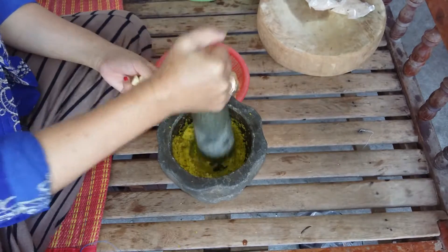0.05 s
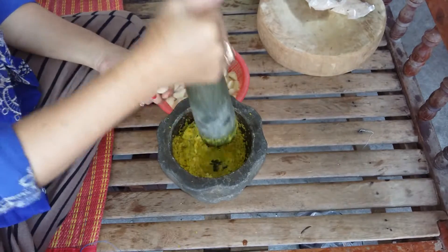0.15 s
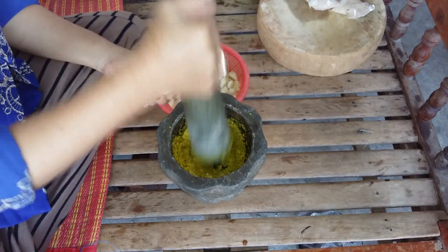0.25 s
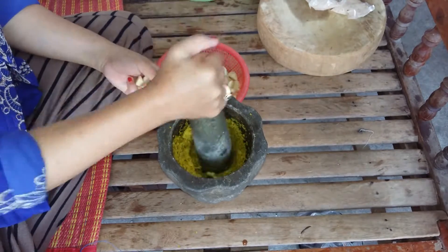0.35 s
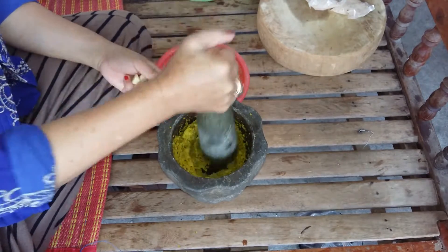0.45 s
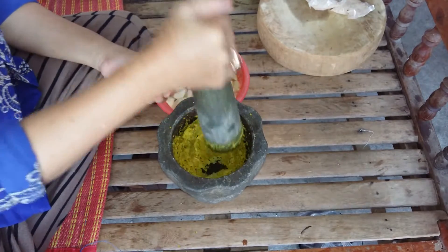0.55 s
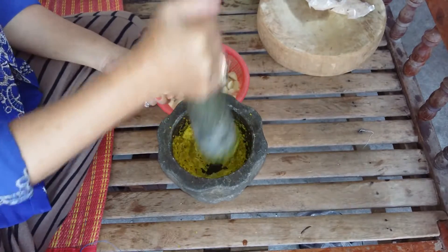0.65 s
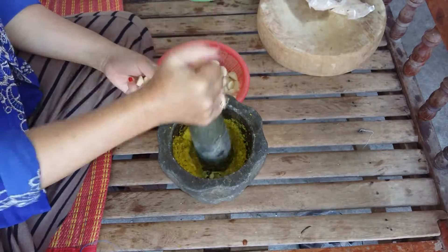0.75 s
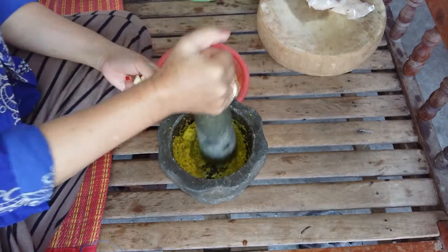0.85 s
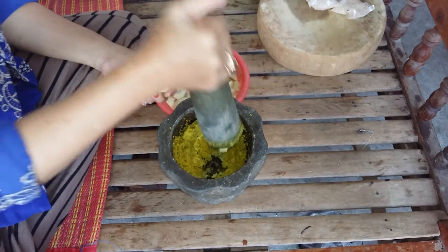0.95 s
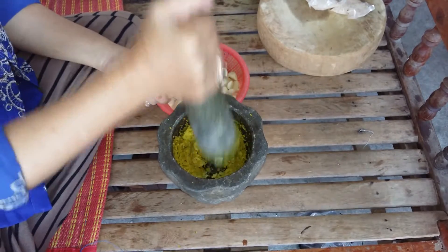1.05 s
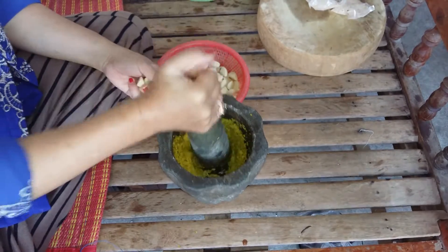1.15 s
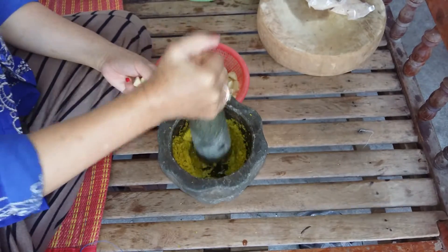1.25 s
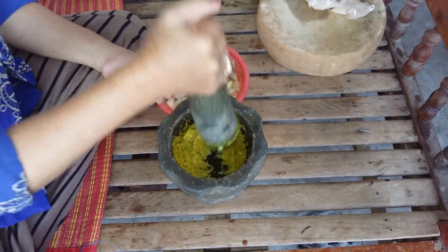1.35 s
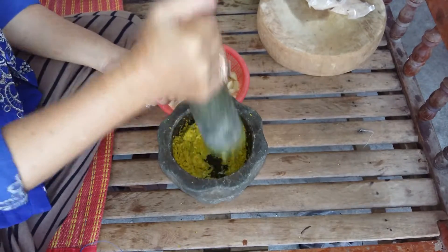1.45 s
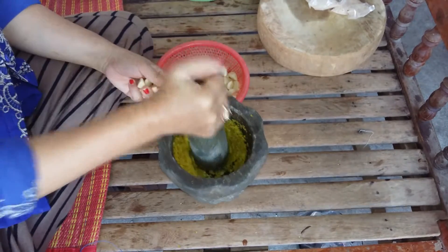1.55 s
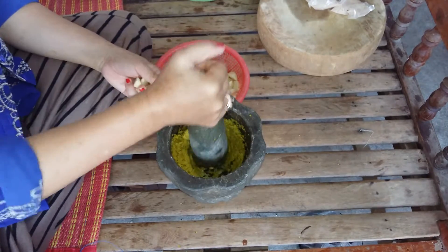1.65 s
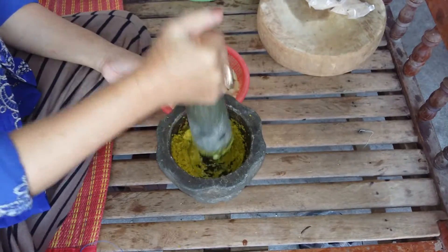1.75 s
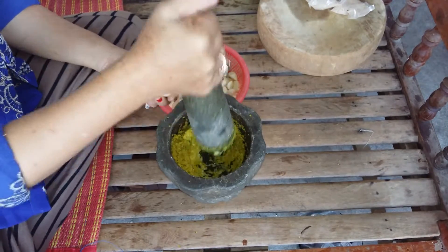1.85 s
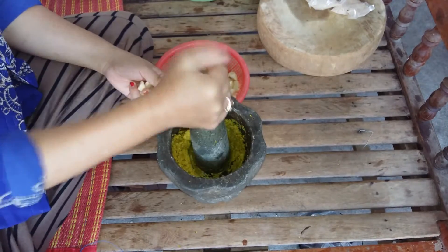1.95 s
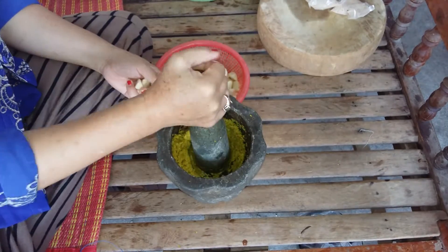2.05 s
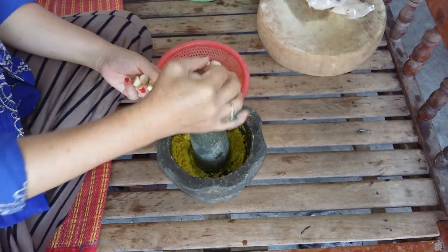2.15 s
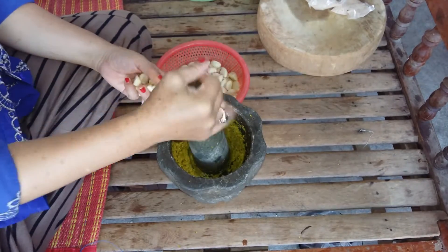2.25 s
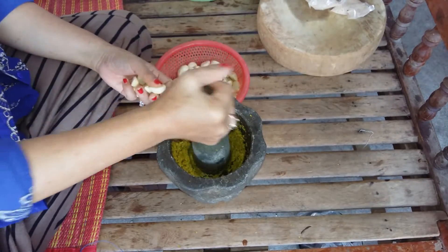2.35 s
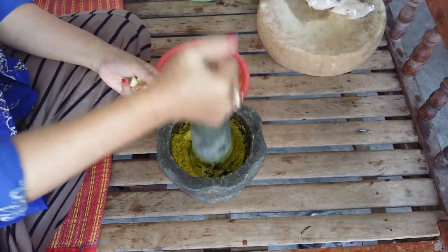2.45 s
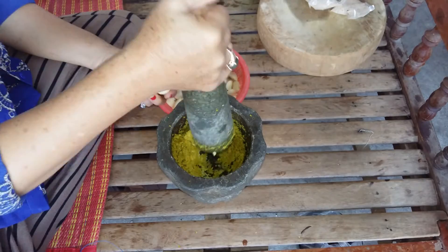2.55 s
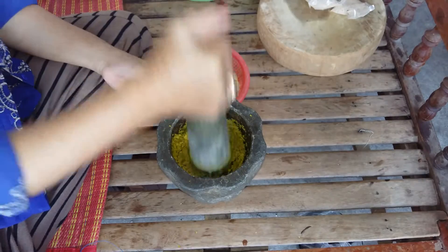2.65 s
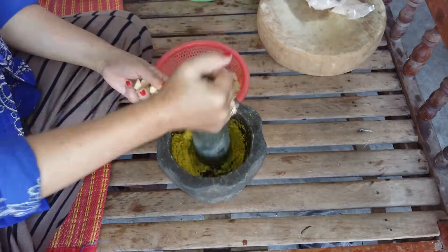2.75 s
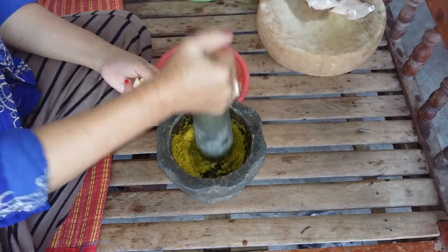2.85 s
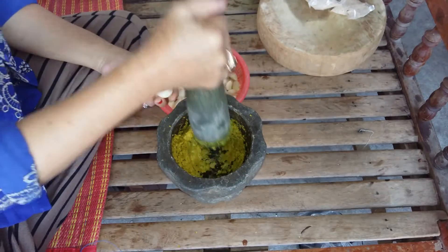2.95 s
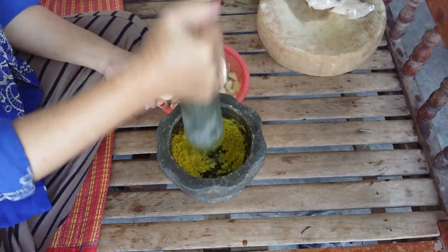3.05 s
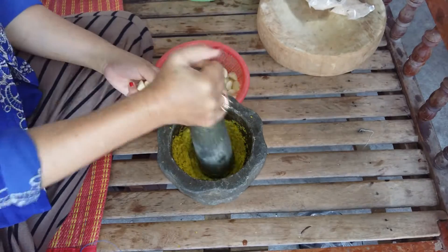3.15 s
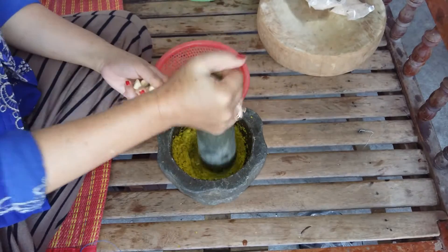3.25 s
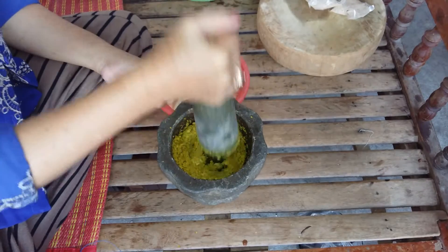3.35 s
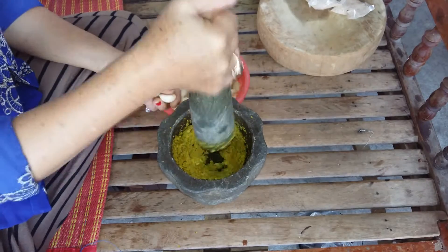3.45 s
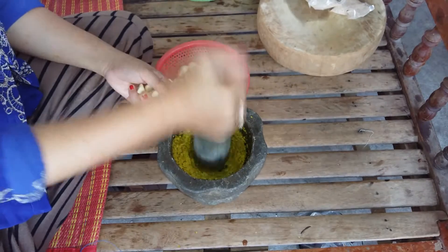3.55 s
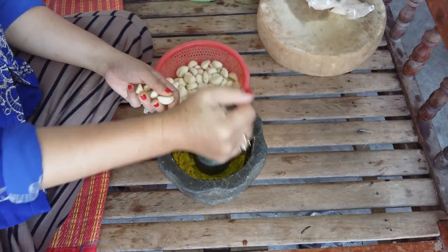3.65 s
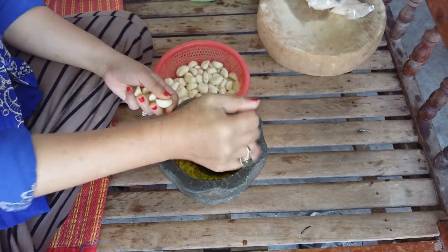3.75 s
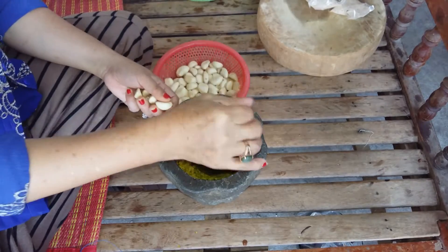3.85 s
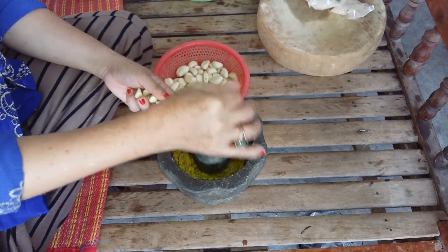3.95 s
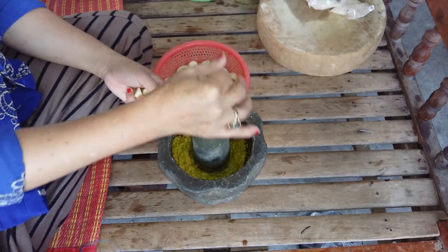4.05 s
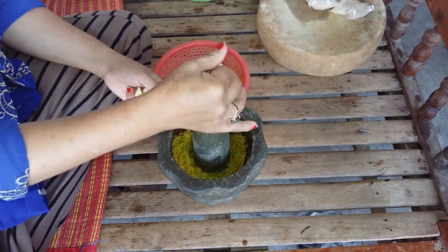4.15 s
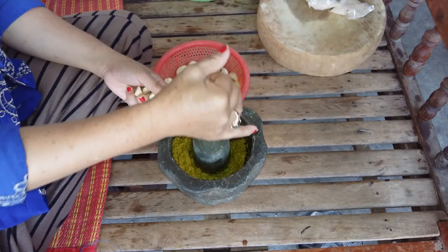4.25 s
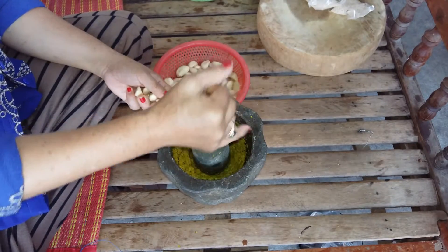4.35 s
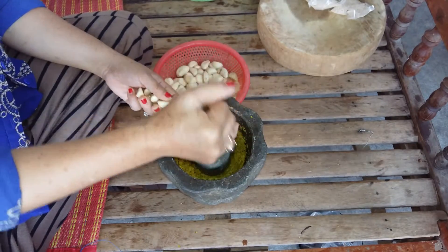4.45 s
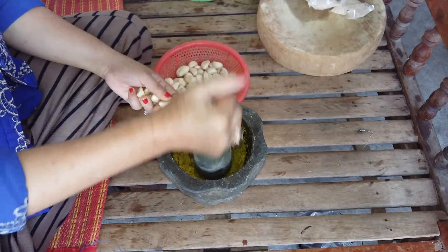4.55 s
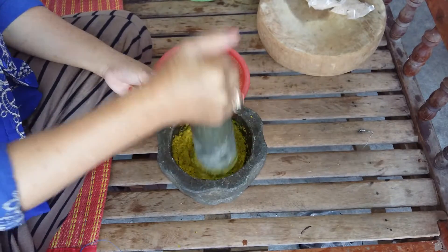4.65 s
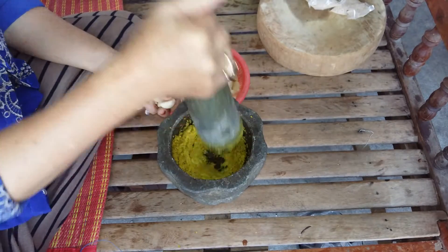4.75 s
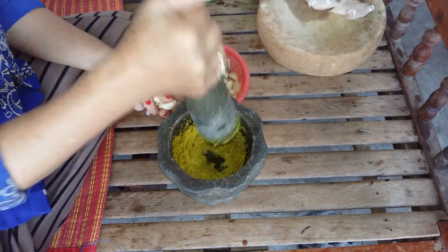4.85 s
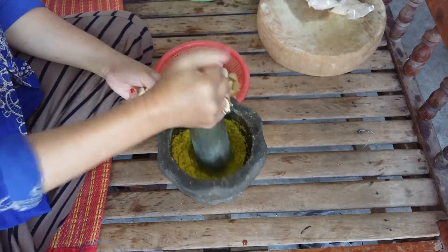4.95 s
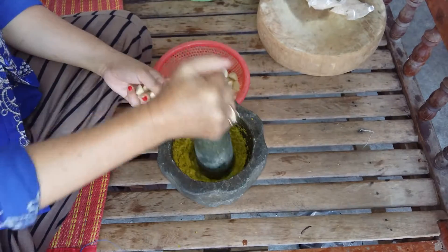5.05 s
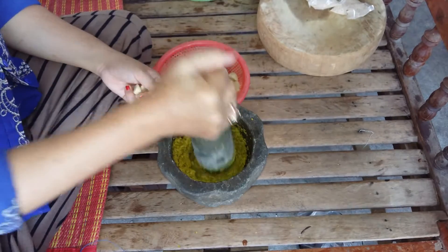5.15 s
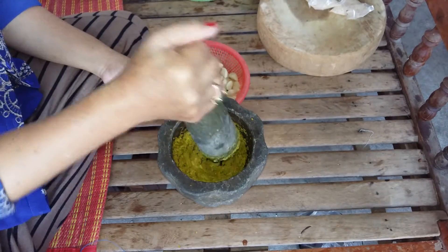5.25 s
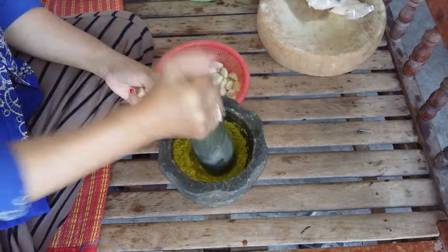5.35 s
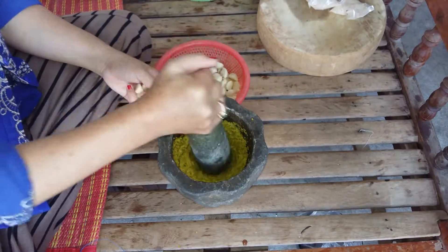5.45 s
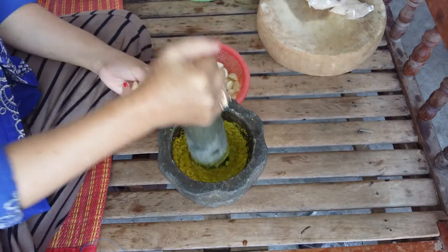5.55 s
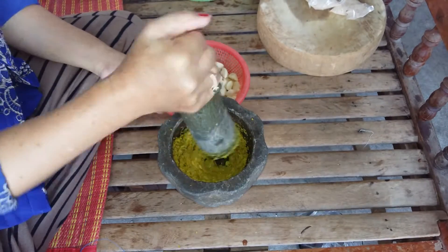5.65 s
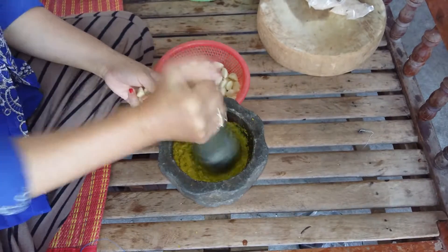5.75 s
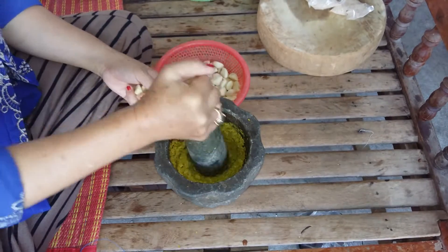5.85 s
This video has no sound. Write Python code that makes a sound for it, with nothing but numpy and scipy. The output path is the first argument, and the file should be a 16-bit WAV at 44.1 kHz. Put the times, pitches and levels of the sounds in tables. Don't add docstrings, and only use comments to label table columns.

```python
import sys
import numpy as np
from scipy import signal
from scipy.fft import rfft, irfft, next_fast_len
from scipy.io import wavfile
from scipy.ndimage import map_coordinates

SR = 44100
rng = np.random.default_rng(int(sys.argv[2]) if len(sys.argv) > 2 else 0)


def materialize(psi):
    bounded = np.clip(np.atleast_2d(psi).T, -1, 1)
    quanta = np.round(bounded * 32767).astype(np.int16)
    wavfile.write(sys.argv[1], SR, quanta)


def volts(x):
    e = np.asarray(x, float) / 20
    return 10 ** e


N = 260631
SPAN = 32768
CONTACT_N = 6000
SPIT_S = 0.001

# f/Hz, level/dB
MIC = [(20, -27.5), (60, -15.5), (200, -6), (3500, -1), (4500, -2), (6000, 3.5), (6800, -7), (7500, -14),
       (9000, -23), (12000, -38), (16000, -45.5)]


def pounding():
    out = np.zeros((2, N + 3 * SPAN))
    hard_blows(out)
    pestle_ring(out)
    paste_landings(out)
    mortar_hops(out)
    return filtered(out, lambda hz: causal(MIC, hz))[:, SPAN:SPAN + N]


# t/s, peak/dB, knock f/Hz, slat thump/dB re peak, crack/dB re peak
BLOWS = [
    (-0.029, 8, 889.5, -20, -15),
    (1.186, -1, 1818, -19, -19.5),
    (1.5904, -1, 1975, -21.5, -21.5),
    (2.021, 2, 887, -26.5, -20),
    (3.6705, 4.5, 882, -17.5, -17.5),
    (5.465, 6.5, 891, -18.5, -16.5),
]
# t/s, peak/dB, knock f/Hz
REBOUNDS = [
    (1.196, -4, 871),
    (3.685, -4, 895),
    (5.471, -11.5, 1017),
]


def hard_blows(out):
    for s, *how in BLOWS:
        add(out, s, shelter(*blow(*how, rattle_db=-10), wet_db=6))
    for s, db, knock_hz in REBOUNDS:
        near, sent = blow(db, knock_hz, thump_db=-17.5, crack_db=-14.5, rattle_db=-12.5)
        add(out, s, shelter(near, sent, wet_db=6))


def blow(db, knock_hz, thump_db, crack_db, rattle_db):
    t = np.arange(CONTACT_N) / SR
    push = impulse(0.001)
    cycles = knock_hz * t

    swell = (cycles / 1.3) ** 2 * np.exp(2 - 2 * cycles / 1.3)
    linger = 0.17 * (1 - np.exp(-(cycles / 2) ** 2)) * volts(-60 * cycles / 25)
    upper = 0.67 * (880 / knock_hz) ** 2 * np.sin(2 * np.pi * 1.728 * cycles)
    knock = (np.sin(2 * np.pi * cycles) + upper) * (swell + linger)

    bright = lambda hz: 1j * hz / (1j * hz + 2500)
    crack_env = volts(crack_db + 7.5 - 60 * t / 0.012) * (1 - np.exp(-(t / 0.00013) ** 2))
    crack = crack_env * filtered(rng.standard_normal(len(t)), bright)
    chip = volts(crack_db + 8) * burst(t, SPIT_S, lambda f: band(12000, 8000)(f) ** 2)

    wood = table(t, volts(thump_db - 10) * push, rattle_db - 28)
    wood = wood + filtered(volts(-11) * push, body(BOWL))
    rise_s = 0.0025
    thud = volts(thump_db + 3) * np.sin(2 * np.pi * 310 * t) * t / rise_s * np.exp(1 - t / rise_s)

    snap = filtered(volts(crack_db + 27) * push, bright)
    pulse = np.sin(2 * np.pi * cycles) * cycles * np.exp(1 - cycles / 0.7)
    near = thud - volts(-4.5) * knock + crack + chip + wood
    return volts(db) * near, volts(db) * (volts(-6.5) * pulse + snap + wood)


# t/s, level/dB
RING = [
    (1.5909, -2),
]
PESTLE_HZ = [2915, 2995, 3060, 3120, 2930, 3009, 3068]
# level/dB, t60/s
PESTLE = [(-5, 0.042), (-7, 0.091), (-11, .1), (-18, 0.0804), (-36.5, .5), (-33, .7), (-33.5, 0.63)]


def pestle_ring(out):
    t = np.arange(SPAN) / SR
    ring = np.zeros(SPAN)
    for k, (hz, (level, t60)) in enumerate(zip(PESTLE_HZ, PESTLE)):
        ring += (-1) ** k * volts(level - 60 * t / t60) * np.sin(2 * np.pi * hz * t)
    for s, db in RING:
        add(out, s, shelter(volts(db) * ring, volts(db) * ring, wet_db=-0.5))


# t/s, tick/dB, slat thump/dB
TICKS = [(0.3721, -16.5, -34), (0.4057, -27.5, -31), (0.431, -27, -45.5), (0.7838, -19, -27),
         (0.84, -20, -50.5), (1.687, -25.5, -34.5), (2.3152, -45.5, -58.5), (2.797, -35.5, -42),
         (3.2039, -34, -64), (3.2121, -31, -52), (5.0431, -23, -46.5), (5.052, -27.5, -50),
         (5.8532, -30, -54), (5.8622, -26.5, -38)]
# t/s, crunch/dB, slat thump/dB
CRUNCHES = [(0.3871, -24.5, -33), (0.4295, -26.5, -50.5), (0.4802, -41, -46), (0.7957, -24, -27),
            (0.842, -24, -38.5), (0.8979, -41.5, -41), (2.8125, -37, -40.5), (2.8421, -42, -65),
            (2.8803, -40.5, -44), (3.4636, -59.5, -48.5), (5.065, -32.5, -27), (5.0841, -21.5, -35),
            (5.115, -38, -34.5), (5.8733, -34, -35), (5.9064, -46.5, -26)]


def paste_landings(out):
    for s, db, thump_db in TICKS:
        near, sent = squash(db, db - 19.5, thump_db, life_s=0.004, rattle_db=-48)
        add(out, s, shelter(near, sent, wet_db=1))
    for s, db, thump_db in CRUNCHES:
        near, sent = squash(db - 9, db, thump_db, life_s=0.0043, rattle_db=db - 13.5)
        add(out, s, shelter(near, sent, wet_db=1))


def squash(tick_db, crunch_db, thump_db, life_s, rattle_db):
    t = np.arange(CONTACT_N) / SR
    wet = volts(tick_db + 4.5) + volts(crunch_db + 2)
    tick = wet * burst(t, life_s, lambda f: band(6000, 2200)(f) + band(11000, 9000)(f) ** 2)
    spit = wet * volts(1) * burst(t, SPIT_S, lambda f: band(12000, 8000)(f) ** 2)
    grit = lambda f: band(1350, 2000)(f) * (1 + 0.1 * body(BOWL)(f))
    crunch = volts(crunch_db + 8) * burst(t, 2.2 * life_s, grit)
    wood = table(t, volts(thump_db + 0.5) * impulse(0.004), rattle_db - 17)
    sent = volts(0.5) * (volts(-1) * tick + crunch) + volts(4) * wood
    return tick + spit + volts(0.5) * crunch + wood, sent


# first hop t/s, level/dB, slat f/Hz, hop interval/s
ROCKS = [(0.566, -38.5, 305, 0.066), (0.973, -37.5, 310, 0.061), (1.319, -29.5, 294, .062),
         (1.449, -42.5, 327, .061), (1.74, -33.5, 310, 0.07), (2.199, -46, 298, 0.067),
         (2.993, -46.5, 307.4, 0.06), (3.269, -43, 320, 0.054), (5.299, -43.5, 367, 0.09)]
# t/s, level/dB
TAPS = [
    (1.104, -51),
    (3.369, -53),
    (3.430, -52),
]


def mortar_hops(out):
    for s, db, hz, interval_s in ROCKS:
        for k in range(3):
            add(out, s + k * interval_s, shelter(*rock(db - 7 * k, hz, tap_db=-3), wet_db=-7.5))
    for s, db in TAPS:
        add(out, s, shelter(*rock(db, 330, tap_db=5), wet_db=-7.5))


def rock(db, hz, tap_db):
    t = np.arange(CONTACT_N) / SR
    hollow = np.sin(2 * np.pi * hz * t) * (t / 0.012) * np.exp(1 - t / 0.012)
    tap = volts(tap_db + 4.5) * burst(t, 0.029, lambda f: band(800, 900)(f) ** 2)
    return volts(db - 1) * (hollow + tap), volts(db + 2) * (hollow + tap)


# f/Hz, width/Hz, level/dB
SLATS = [(104, 110, 1), (165, 37, -3), (221, 38, -2.5), (320, 49, -1), (377, 37, -3), (562.3, 78, 0),
         (722, 72, -4.5)]
# f/Hz, width/Hz, level/dB
BOWL = [(889, 300, -8.5), (1467, 220, -6), (2060, 590, -2), (3200, 545, -1.5)]


def table(t, push, rattle_db):
    noise = rng.standard_normal((2, len(t)))
    chatter = volts(rattle_db - 60 * t / 0.26 + 5.4 * noise[0]) * noise[1] * (1 - np.exp(-t / 0.0051))
    slats = filtered(push + volts(-20.5) * chatter, body(SLATS))
    return slats + filtered(volts(-12.5) * chatter, body(BOWL)) + filtered(chatter, band(3700, 6000))


# t/s, effort/dB
EFFORT = [(0, -49), (.2, -48.5), (.6, -52), (1.2, -52), (1.36, -41.5), (1.56, -49), (2.15, -56.5),
          (2.6, -68.5), (2.98, -58.5), (3.3, -57), (3.52, -49), (3.83, -56.5), (4.36, -67), (4.9, -69.5),
          (5.1, -49.5), (5.25, -42.5), (5.43, -44.5), (5.58, -111)]
# t/s, level/dB
PULLS = [(.07, -32), (.18, -68), (1.36, -45.5), (1.78, -63.5), (2.19, -53), (3.24, -66), (3.64, -74),
         (3.85, -61), (4.0, -64), (5.24, -50), (5.36, -64)]
# f/Hz, level/dB
RUB = [(120, -35), (220, -2.5), (350, 0.5), (700, -7), (1500, -17), (3000, -50)]
# f/Hz, level/dB
RUMBLE = [(30, -46), (60, -2.5), (110, 2.5), (180, -2), (300, -46.5)]
# f/Hz, level/dB
SQUELCH = [(800, -29.5), (1500, 2), (3000, -2.5), (4500, -8), (6000, -2), (7500, -18), (9000, -50),
           (11000, -91.5)]


def grinding():
    t = np.arange(N) / SR
    effort_db = np.interp(t, *np.transpose(EFFORT))
    rub = volts(effort_db - 3.5) * volts(2.5 * wobble(18)) * rush([*RUB, (7000, -110)])
    rumble = volts(effort_db - 4.5) * rush([*RUMBLE, (800, -110)])

    usual_db, rise_s, fall_s = -50.5, 0.04, 0.065
    wet = volts(usual_db - 17.5 + 0.85 * (effort_db - usual_db))
    for s, db in PULLS:
        wet = wet + volts(db) * np.exp(np.minimum((t - s) / rise_s, (s - t) / fall_s))
    return rub + rumble + wet * volts(1.3 * wobble(27)) * rush(SQUELCH)


# t/s, length/s, f/Hz, level/dB
SLIDES = [
    (5.375, .09, 5950, -63),
    (5.16, .2, 6000, -65),
    (3.18, .07, 5900, -64),
]


def slides():
    return sum(swelling_band(*row) for row in SLIDES)


# t/s, length/s, f/Hz, level/dB
BIRDS = [(1.97, .06, 4650, -74), (2.628, 0.086, 4170, -76), (3.433, 0.14, 4400, -68),
         (4.051, 0.13, 4670, -72), (4.894, 0.22, 4560, -76), (4.91, 0.12, 3900, -76),
         (4.55, 0.2, 1712, -81.5), (4.85, 0.2, 1712, -81)]


def birds():
    return sum(swelling_band(*row) for row in BIRDS)


def swelling_band(s, length_s, hz, db):
    width_hz = hz ** 2 * 1.2e-5
    x = filtered(rng.standard_normal((2, N)), lambda f: 1 / (1 + ((f - hz) / width_hz) ** 2))
    phase = np.clip((np.arange(N) / SR - s) / length_s, 0, 1)
    return volts(db) * unit(x) * np.sqrt(np.sin(np.pi * phase).clip(0))


# f/Hz, level/dB per Hz
FAR = [(24, -50), (40, -23.5), (59, -2.5), (186, -4), (351, -19.5), (384, -11), (478, -24), (664, -14.5),
       (1460, -45.5), (1670, -31.5), (2530, -50), (5960, -34), (7590, -54.5), (9870, -83), (16700, -120)]


def traffic():
    return volts(-63.5 + 1.2 * wobble(3)) * rush(FAR) + volts(-91.5) * rng.standard_normal((2, N))


# f/Hz, t60/s
SHELTER = [(100, 0.31), (300, 0.37), (800, 0.38), (3000, 0.39), (6500, 0.37), (8500, 0.32), (15000, 0.32)]


def shelter(near, sent, wet_db):
    hz, t, z = signal.stft(rng.standard_normal((2, SPAN)), SR, nperseg=256)
    decay = volts(-60 * t / along(SHELTER, hz)[:, None])
    tail = signal.istft(z * decay, SR, nperseg=256)[1][:, :SPAN]
    t = np.arange(SPAN) / SR
    tail = diffuse(tail * (1 - np.exp(-np.maximum(t - 0.004, 0) / 0.0006)))
    sent = filtered(sent, lambda hz: 1 / (1 + 1j * hz / 13600) ** 2)
    wet = signal.fftconvolve(sent[None], tail / np.linalg.norm(tail[0]), axes=1)[:, :SPAN]

    near = np.pad(near, (0, SPAN - len(near)))
    lag_s = np.array([[0], [2.8e-5]])
    direct = filtered(np.array([near, near]), lambda hz: np.exp(-2j * np.pi * hz * lag_s))
    return (direct + volts(wet_db) * wet) * volts([[-0.4], [0.4]])


# f/Hz, likeness/1
ALIKE = [(60, 0.8), (120, 1), (240, 0.93), (470, 0.73), (920, 0.24), (1820, 0), (3610, 0.12), (7140, 0)]


def diffuse(pair):
    turn = lambda hz: np.arccos(np.clip(along(ALIKE, hz), -1, 1)) / 2
    mid, side = filtered(pair, lambda hz: np.array([np.cos(turn(hz)), np.sin(turn(hz))]))
    return np.array([mid + side, mid - side])


def rush(spectrum):
    noise = diffuse(rng.standard_normal((2, N)))
    return unit(filtered(noise, lambda hz: volts(along(spectrum, hz))))


def burst(t, life_s, response):
    shape = (1 - np.exp(-t / 0.0007)) * np.exp(-(t / life_s) ** 1.5)
    x = filtered(rng.standard_normal(len(t)) * shape, response)
    return x / np.abs(x).max()


def impulse(s):
    push = np.zeros(CONTACT_N)
    push[round(s * SR)] = 1
    return push


def wobble(rate_hz):
    knots = rng.standard_normal(int(N * rate_hz / SR) + 4)
    return map_coordinates(knots, [np.arange(N) * rate_hz / SR])


def body(modes):
    def response(f):
        total = 0
        for k, (hz, width, db) in enumerate(modes):
            total = total + (-1) ** k * volts(db) * SR / np.pi * 1j * f / (hz * hz - f * f + 1j * f * width)
        return total
    return response


def band(hz, width):
    return lambda f: 1j * f * width / (hz * hz - f * f + 1j * f * width)


def causal(points, hz):
    cepstrum = irfft(np.log(volts(along(points, hz))))
    cepstrum[1:len(hz) - 1] *= 2
    cepstrum[len(hz):] = 0
    return np.exp(rfft(cepstrum))


def filtered(x, response):
    m = next_fast_len(x.shape[-1] + 8192)
    return irfft(rfft(x, m) * response(np.fft.rfftfreq(m, 1 / SR)), m)[..., :x.shape[-1]]


def along(points, hz):
    f, v = np.transpose(points)
    return np.interp(np.log(hz + 1), np.log(f + 1), v)


def unit(x):
    return x / np.sqrt(np.mean(x ** 2) + 1e-20)


def add(out, s, x):
    out[:, round(s * SR) + SPAN:][:, :SPAN] += x


def scene():
    return pounding() + grinding() + slides() + birds() + traffic()


def low_pass(x):
    return signal.sosfilt(signal.butter(12, 15750, fs=SR, output="sos"), x)


def record(dry):
    soft = dry / (1 + np.abs(dry / 0.94) ** 6) ** (1 / 6)
    return low_pass(soft)


dry = scene()
out = record(dry)
materialize(out)
```